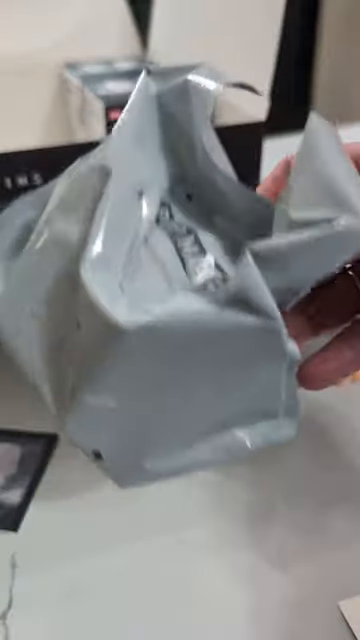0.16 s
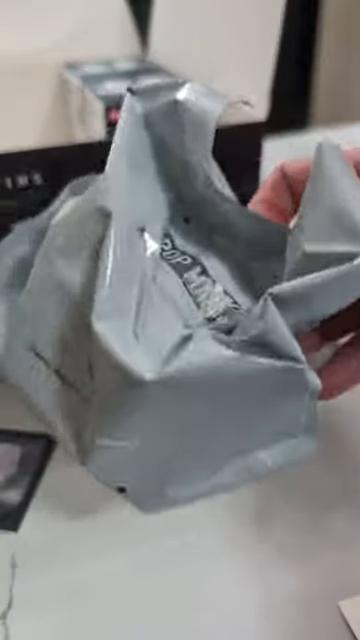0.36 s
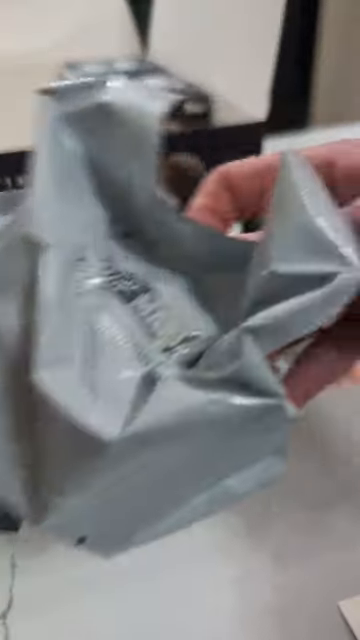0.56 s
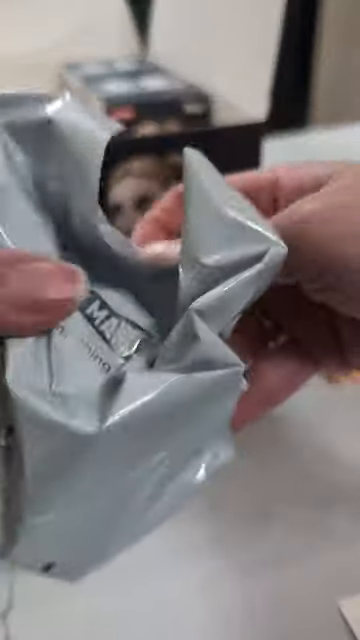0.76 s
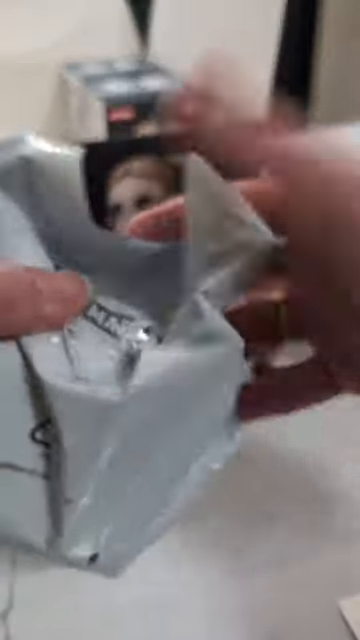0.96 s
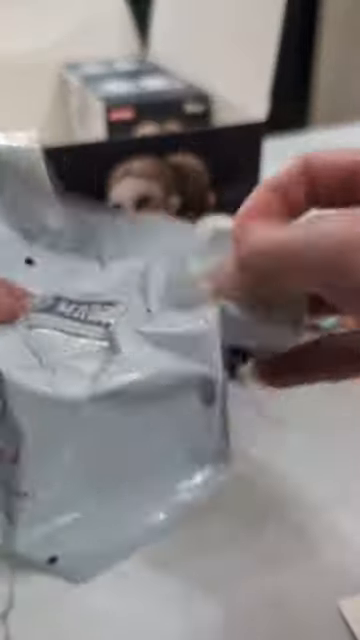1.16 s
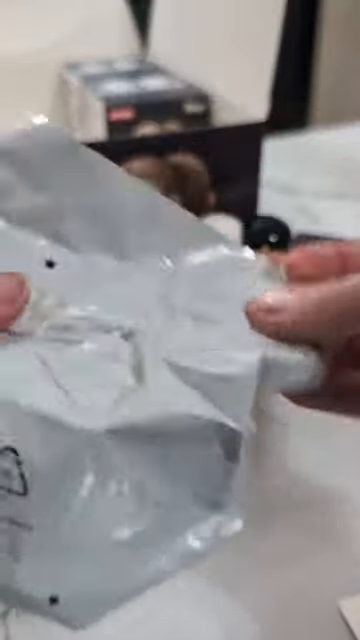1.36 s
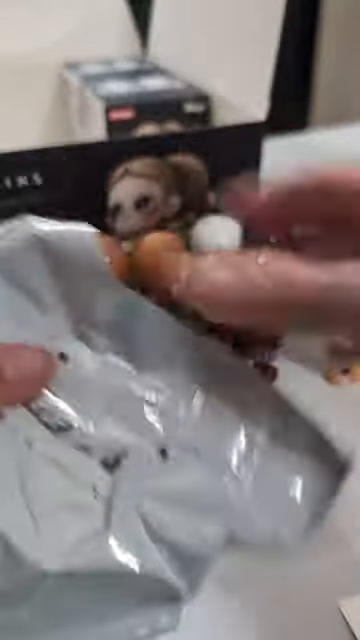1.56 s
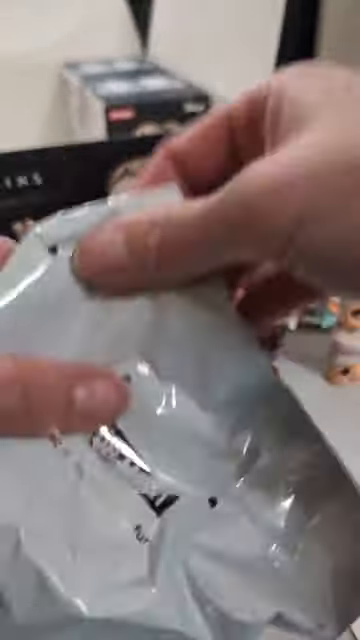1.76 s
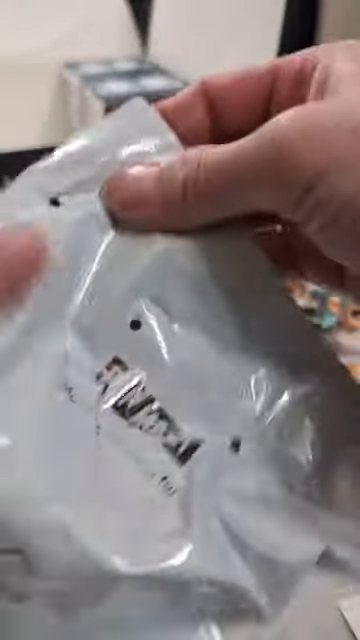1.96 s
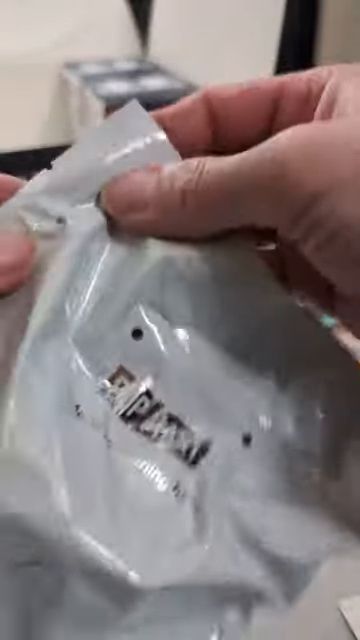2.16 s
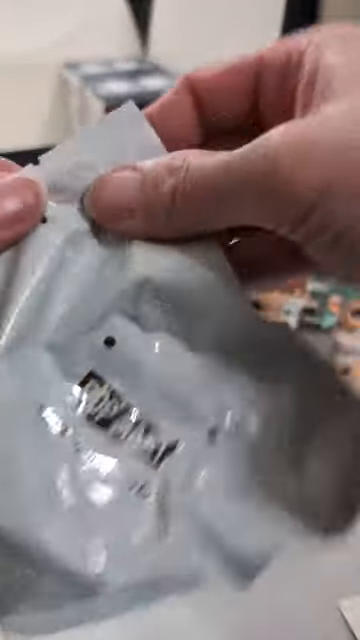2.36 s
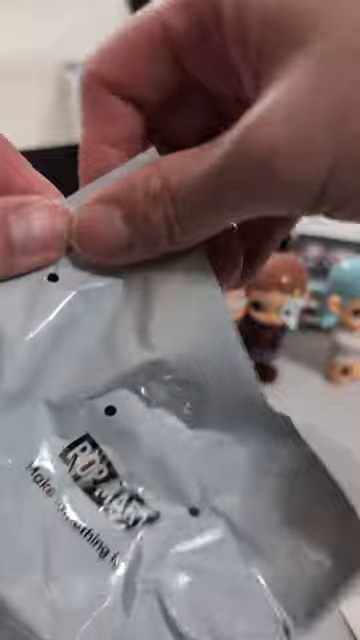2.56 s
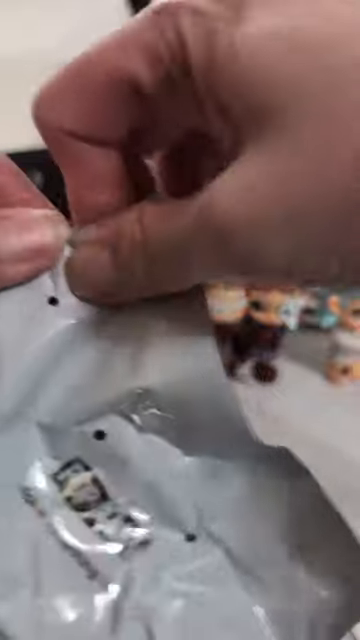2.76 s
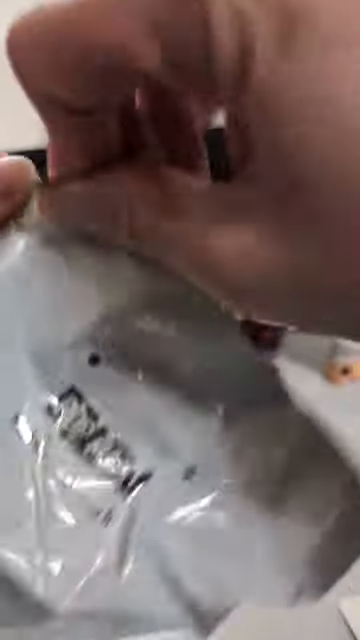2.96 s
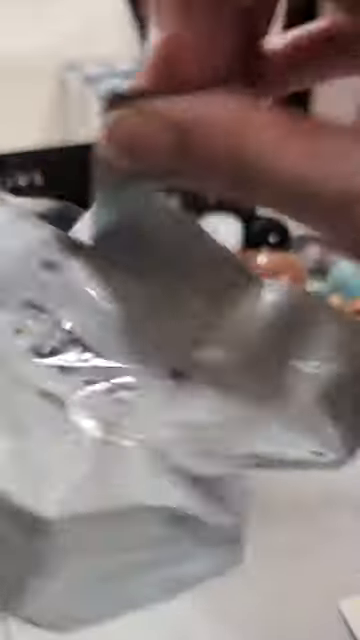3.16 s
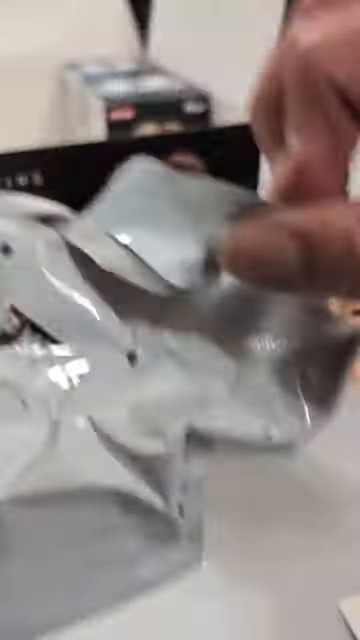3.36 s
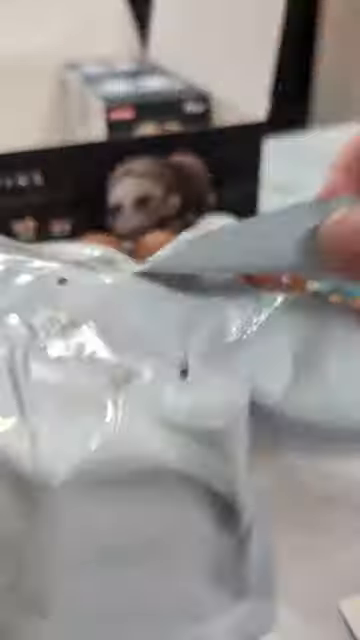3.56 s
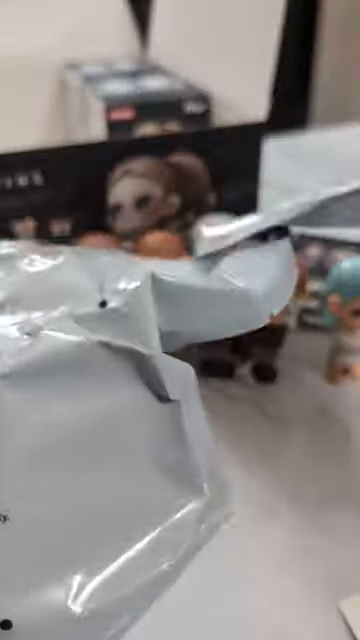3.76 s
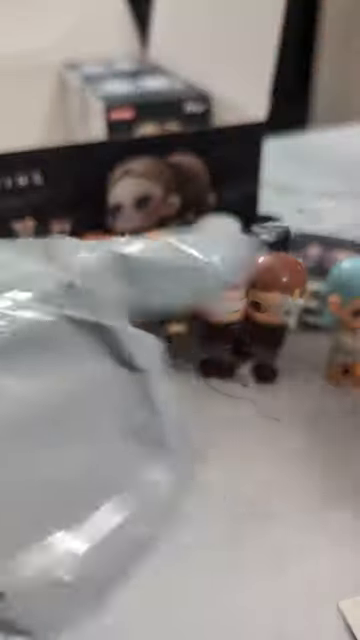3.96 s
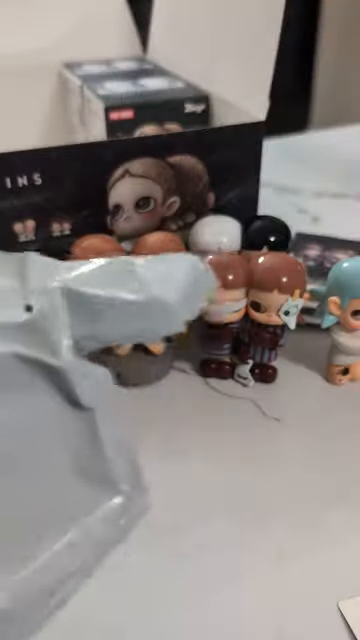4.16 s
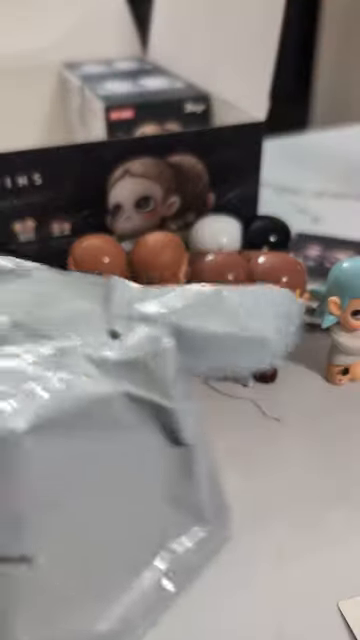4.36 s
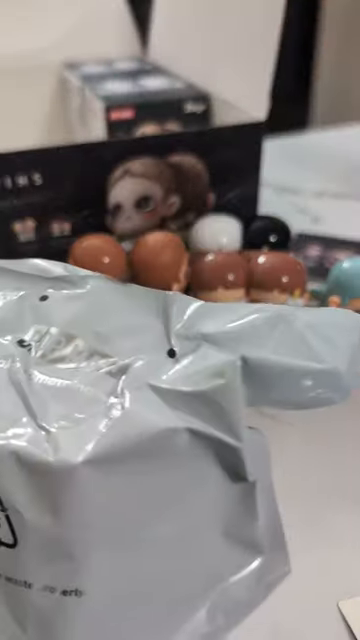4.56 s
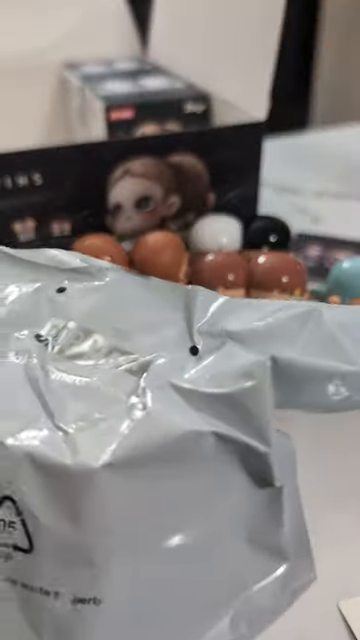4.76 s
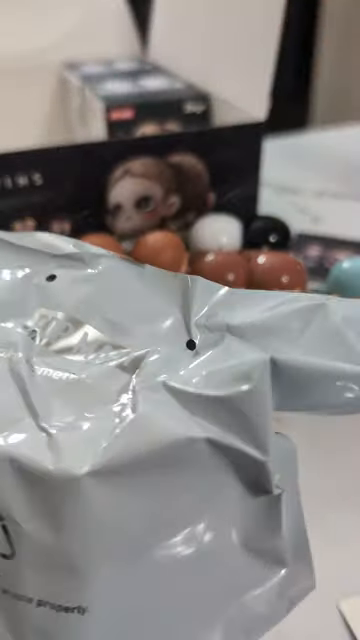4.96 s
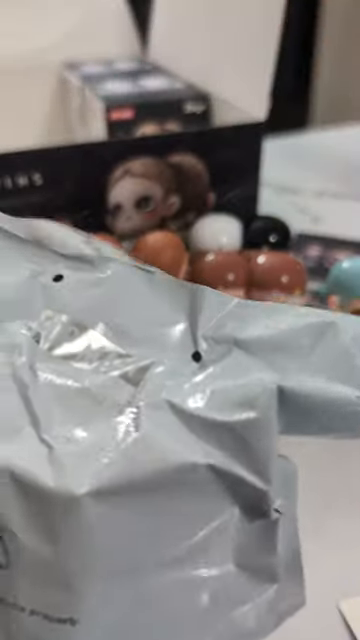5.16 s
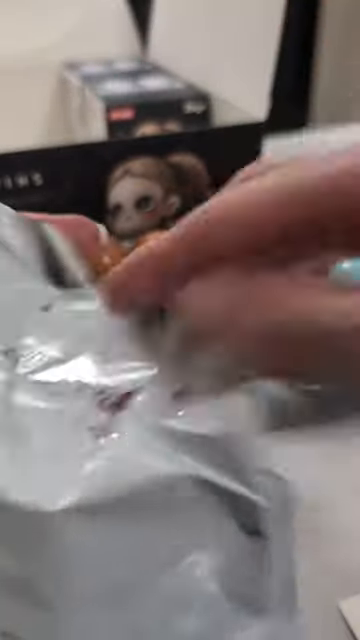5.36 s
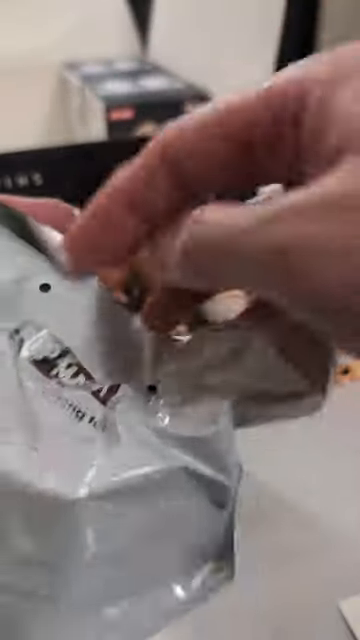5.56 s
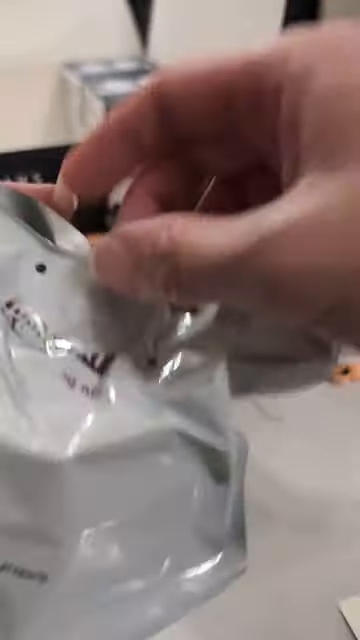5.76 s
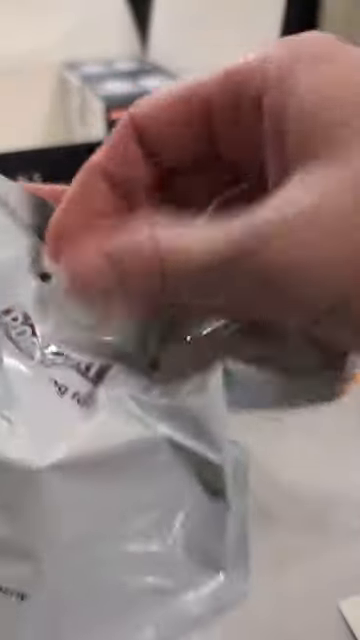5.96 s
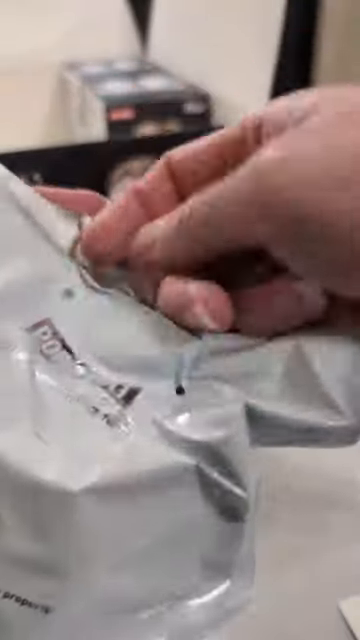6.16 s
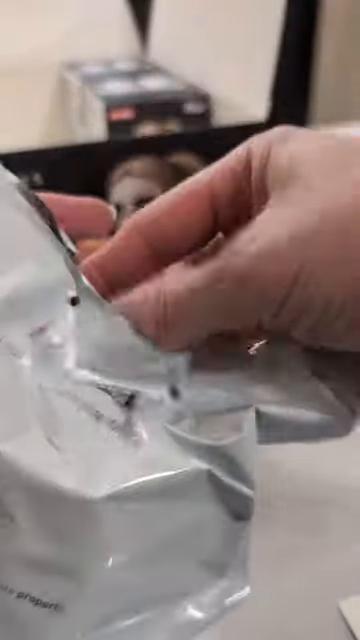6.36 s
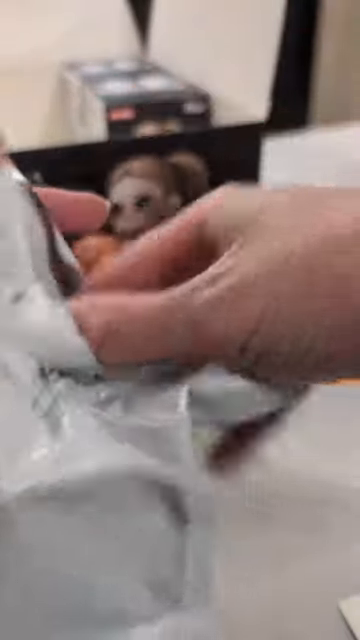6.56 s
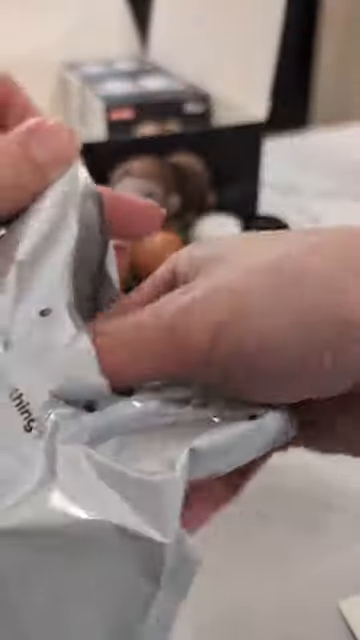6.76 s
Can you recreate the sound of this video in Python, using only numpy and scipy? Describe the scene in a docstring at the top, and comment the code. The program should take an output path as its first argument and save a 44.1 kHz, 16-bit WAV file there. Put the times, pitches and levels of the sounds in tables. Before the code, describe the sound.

A stiff foil pouch is handled very close to two microphones in a small quiet room. It starts with a few crinkles and a hollow thump, then bursts into dense, bright crackling with snapping creases and popping panels. After four seconds it nearly stops, leaving faint room tone and a thin high whistle, then brisk crinkling resumes to the end.

```python
"""Crinkling of a stiff foil pouch

Two hands turn, tear and crinkle a stiff foil pouch close to two spaced microphones.
Buckling creases snap as short noise bursts in four bands; many smaller bursts and a hiss crackle below.
The hollow rings as decaying sines, popping panels push low swings, and slack walls flap as bass noise.
The room answers with a short noise tail over steady room tone; narrow noise whistles faintly in the pause.
"""
import sys
import numpy as np
from scipy import signal
from scipy.fft import rfft, irfft
from scipy.io import wavfile
from scipy.ndimage import uniform_filter1d

SR = 44100
rng = np.random.default_rng(int(sys.argv[2]) if len(sys.argv) > 2 else 0)


def int16_out(signal):
    """Quantize to a 16-bit WAV file."""
    q = np.round(np.clip(np.atleast_2d(signal).T, -1, 1) * 32767)
    wavfile.write(sys.argv[1], SR, q.astype(np.int16))


N = 299880  # samples in the scene
LEAD = 8  # samples by which the left microphone is earlier


def gain_of(db):
    """Decibel law: amplitude gain from a level."""
    return 10 ** (np.asarray(db) / 20)


def evened(x):
    """Power normalisation: scales to rms 1."""
    return x / np.sqrt(np.mean(x ** 2) + 1e-20)


def read(points, hz):
    """Logarithmic frequency scale: interpolates a spectrum table."""
    f, value = np.transpose(points)
    return np.interp(np.log(hz + 1), np.log(f + 1), value)


def along(rows, s):
    """Linear interpolation: a two-column curve at the times s."""
    return np.interp(s, *np.transpose(rows))


def band(x, edges_hz, order=2):
    """Causal band-pass filtering along the last axis."""
    sos = signal.butter(order, edges_hz, "bandpass", fs=SR, output="sos")
    return signal.sosfilt(sos, x)


def pair(shape, alike):
    """Partial coherence: noise for two microphones, its shared power arriving earlier at the left."""
    alike = np.clip(alike, 0, 1)
    shared, left, right = np.moveaxis(rng.standard_normal((*shape, 3)), -1, 0)
    common = np.array([shared, np.roll(shared, LEAD, -1)])
    return np.sqrt(alike) * common + np.sqrt(1 - alike) * np.array([left, right])


def place(s, sounds):
    """Superposition: mixes short sounds (channels, events, samples) at their times."""
    out = np.zeros((2, N + SR))
    starts = np.maximum(np.round(np.asarray(s) * SR), 0).astype(int)
    for at, sound in zip(starts, np.moveaxis(sounds, 1, 0)):
        out[:, at:at + sound.shape[1]] += sound
    return out[:, :N]


def leaned(sounds, left_right_db):
    """Level-difference stereo: splits the difference evenly between the channels."""
    return sounds * gain_of([left_right_db / 2, -left_right_db / 2])


# spectral shape of the room tone: f/Hz, relative density level/dB per Hz
ROOM_TONE = [(24, -34.5), (40, -5.5), (75, -15), (215, -41.5), (1900, -24.5), (7170, -37), (7730, -28.5),
             (8550, -35.5), (16000, -74)]
ROOM_TONE_DB = -70.5  # rms level


def air():
    """Stationary noise: steady room tone, shaped in the frequency domain."""
    spectrum = rfft(pair((N,), 0.91))
    shape = gain_of(read(ROOM_TONE, np.fft.rfftfreq(N, 1 / SR)))
    return gain_of(ROOM_TONE_DB) * evened(irfft(spectrum * shape, N))


# how hard the hands work the foil, as the level of the fine crackle: t/s, level/dB
EFFORT_CURVE = [(0.0, -44.5), (0.2, -52.5), (0.51, -64.5), (0.6, -60.5), (0.735, -67.5), (0.76, -43.5),
                (0.93, -43.5), (0.97, -50), (1.1, -47), (1.17, -36), (1.4, -39.5), (1.59, -38),
                (1.65, -46.5), (1.76, -53), (1.83, -38), (1.93, -47), (2.05, -35), (2.29, -39.5),
                (2.36, -56), (2.5, -49), (2.6, -54), (2.75, -57), (3.0, -52.5), (3.14, -43), (3.19, -28),
                (3.26, -30), (3.31, -45.5), (3.37, -49.5), (3.56, -57), (3.66, -35.5), (3.74, -26.5),
                (3.81, -34.5), (3.87, -56), (3.97, -31), (4.06, -36), (4.235, -72.5), (4.64, -82.5),
                (4.8, -63), (4.905, -77.5), (4.92, -57.5), (5.2, -87.5), (5.25, -51), (5.36, -77.5),
                (5.44, -33), (5.52, -47.5), (5.59, -60), (5.75, -57.5), (5.8, -47.5), (5.92, -54),
                (6.02, -52), (6.06, -45), (6.22, -41), (6.36, -48.5), (6.47, -40), (6.6, -43), (6.7, -31.5),
                (6.745, -40), (6.8, -35.5)]
SETTLE_DB, SETTLE_S = -26.5, 0.051  # level under the snap; time constant of its power
BRISK_DB = -40  # handling level that counts as brisk


def handling():
    """Power summation: handling level in dB, the effort plus creases crackling on after each snap."""
    s, db = np.array(SNAP_EVENTS).T[:2]
    kicks = np.zeros(N)
    np.add.at(kicks, (s * SR).astype(int), gain_of(db + SETTLE_DB) ** 2)
    settling = signal.lfilter([1], [1, -np.exp(-1 / (SETTLE_S * SR))], kicks)
    effort = gain_of(along(EFFORT_CURVE, np.arange(N) / SR)) ** 2
    return 10 * np.log10(effort + settling)


# bass, body, edge and treble bands of a crease: lower f/Hz, upper f/Hz
CREASE_BANDS = [(250, 1300), (1300, 3500), (3500, 8000), (8000, 17500)]
# share of each band's power that both microphones hear alike: one fraction per band
BAND_ALIKE = [1, 0.23, 0.18, 0.046]
# relative fading time of each band: one factor per band
BAND_FADE = [1.2, 1.04, 0.97, 1.08]
# where the hands are: t/s, left-right level difference/dB
HAND_SIDE = [(0.0, -4.5), (0.04, 7), (0.11, -1.5), (0.55, -3.5), (0.58, -4.5), (0.85, 4.5), (1.76, 1.5),
             (2.39, 1.5), (2.52, -2), (2.56, 8), (2.88, -2.5), (3.2, 1.5), (6.59, 1.5), (6.8, -1)]


def snap(s, bands_db, length_ms, size=1200, rise=0.38, fall=0.63, after_db=-22, after_ms=10.0,
         scatter_db=3.5, jerk_db=1.23):
    """Buckling: a crease strains, gives way and shivers, bass fading slowest, near the hands."""
    before_ms = 6  # room for the build-up
    ms = np.arange(size) * 1000 / SR - before_ms
    since = np.maximum(ms, 0)
    length = np.clip(length_ms, .4, 8)[:, None]  # scales the rise and fall time constants
    wander = evened(uniform_filter1d(rng.standard_normal((len(s), size)), size=45))
    jerks = gain_of(jerk_db * length * wander)  # a long crease gives way in several jerks
    build_up = np.exp(np.minimum(ms, 0) / (rise * length))
    afterglow = gain_of(after_db) * np.exp(-since / after_ms)
    out = np.zeros((2, len(s), size))
    for edges, db, slow, alike in zip(CREASE_BANDS, bands_db, BAND_FADE, BAND_ALIKE):
        shape = build_up * (np.exp(-since / (slow * fall * length)) + afterglow)
        part = band(pair((len(s), size), alike) * shape * jerks, edges, order=3)
        top = np.sqrt(uniform_filter1d(part ** 2, size=90).max(2))  # rms of the loudest 2 ms
        out += part * (gain_of(db) / top)[:, :, None]
    pan_db = along(HAND_SIDE, s) + scatter_db * rng.standard_normal(len(s))
    return place(s - before_ms / 1000, leaned(out, pan_db[:, None]))


def crackle(hands_db, count=2200, spread_db=7.5, colour_db=18, hiss_db=-7, dulling=0.36, rubbing=0.078):
    """Random superposition: many small creases over skin hiss; gentle handling is duller, more rubbing."""
    when, u, length, *colour = rng.random((count, 7)).T
    s = when * N / SR
    gentle_db = np.minimum(hands_db[(s * SR).astype(int)] - BRISK_DB, 0)
    size_db = spread_db * np.minimum(-np.log(u + 1e-9), 2.5)  # few large creases, many small
    bands_db = size_db + colour_db * np.array(colour) + np.array([[-14], [-5], [0], [-4]])
    bands_db += np.outer([0, 0, 0, dulling], gentle_db)  # only the treble dulls
    grains = snap(s, bands_db, 0.3 + 3.0 * length, size=600)
    hiss = band(pair((N,), 0.063), (1300, 7500), order=1)
    hiss_gain = gain_of(hiss_db - rubbing * (hands_db - BRISK_DB))
    return gain_of(hands_db) * evened(evened(grains) + hiss_gain * evened(hiss))


FLUTTER_DB, FLUTTER_FOLLOW = -46.5, 0.84  # level at brisk handling; dB gained per dB of handling


def flutter(hands_db, lump_db=7):
    """Amplitude modulation: slack walls flap unevenly, mostly in the bass."""
    lumps = np.tanh(evened(uniform_filter1d(rng.standard_normal(N), size=500)))
    walls = band(pair((N,), 0.84), (90, 700))
    level = gain_of(FLUTTER_DB + FLUTTER_FOLLOW * (hands_db - BRISK_DB))
    return level * evened(walls * gain_of(np.minimum(lump_db, 10) * lumps))


# band of the rumble: lower f/Hz, upper f/Hz
SWAY_BAND = (50, 115)
SWAY_DB, SWAY_FOLLOW = -64, 0.32  # level at brisk handling; dB gained per dB of handling


def sway(hands_db):
    """Band-limited noise: a low wandering rumble while the pouch is moved."""
    level = gain_of(SWAY_DB + SWAY_FOLLOW * (hands_db - BRISK_DB))
    return level * evened(band(pair((N,), 0.16), SWAY_BAND))


# creases buckling: t/s, level/dB, boom (bass over that level)/dB, brightness (treble over body)/dB,
# nominal length/ms, which scales the time constants
SNAP_EVENTS = [(0.0408, -35.5, -3.5, -7, 1.6), (0.0539, -32, -3, -5.0, 2.3), (0.1094, -44, 2, -16, 2.2),
               (0.1861, -37, 7.5, -5.0, 9), (0.295, -45, 18.5, -1, 3.8), (0.3376, -44.5, 5, -10, 2.4),
               (0.353, -51, 21, 2, 1.1), (0.693, -70.5, 21, 11, 2.6), (0.7458, -47.5, -5, -1, 3.6),
               (0.8009, -43, -16, -14, 1.9), (0.8167, -37.0, -4, -2, 1.5), (0.83, -26.5, 0, 6.5, 1),
               (0.8844, -35, 14.0, -17, 1.5), (0.9086, -24, -1.0, 1, 0.67), (0.943, -26.5, -2, 5, 3.1),
               (0.9882, -29.5, -20, -4.0, 0.74), (0.9981, -27, -12, -16, 0.96),
               (1.051, -38.5, 12.5, -43.5, 1.55), (1.1514, -34, -4.0, -3, 2.5),
               (1.1556, -21, -8.0, 8.0, 1.1), (1.171, -25.5, 1, 4, 3.2), (1.1796, -25.5, -1, 0, 1.4),
               (1.1836, -27.0, -12, 1.0, 1.8), (1.195, -27, -9.0, 18, 0.93), (1.2105, -19.5, -18, 7.0, 1.5),
               (1.2225, -24, -2.5, 2, 3.4), (1.2314, -20.0, -28, 4.5, 1.1), (1.2465, -23.5, -3.5, 7, 2.4),
               (1.2634, -20.5, -4.5, 8, 0.92), (1.279, -26.5, -12, 4, 1.8), (1.3354, -25.5, 1, 0, 2.5),
               (1.3772, -21, -8, 2.5, 4.8), (1.4093, -23, -10.0, -2, 2), (1.4827, -32.5, 3.5, -14, 0.57),
               (1.5082, -28, -1, 18, 0.96), (1.52, -23, -17, 2, 1), (1.5344, -33, -8, 7, 2.3),
               (1.545, -32.5, -16, -3, 1.7), (1.5733, -29.5, 3, -13, 1.1), (1.5788, -33, 0.5, -11.0, 2.2),
               (1.5843, -24.5, -4.5, 10, 0.98), (1.6056, -28.0, -1, -8.5, 1.4), (1.7045, -40, -6, -9, 1.4),
               (1.721, -38.5, -7, -2, 2), (1.7267, -32.0, -11, -2, 1.8), (1.7737, -31, -13.0, -5, 1.5),
               (1.7914, -32.5, 1, -3, 1.7), (1.8139, -38.0, 9.5, -15, 1.2), (1.8345, -19.5, -5.5, 2.5, 5.3),
               (1.8856, -35.5, 0, -27.5, 2.9), (1.9073, -30, -13.0, -4, 2.3), (1.944, -19, 4.5, 3.5, 1.9),
               (1.9624, -25, -13, 1, 2.4), (2.02, -21.5, -22, 5.5, 1.3), (2.038, -27.5, -4, 9, 2.4),
               (2.0528, -27.5, -17, 4, 3.3), (2.0661, -23, -5, 0, 5.8), (2.1063, -25.5, -4.5, 0, 1.3),
               (2.144, -20.5, -13.0, 3, 1), (2.1662, -25.5, -19, -2, 4), (2.1791, -25, -5.5, -4, 2.8),
               (2.2253, -41, 8, -23, 1.5), (2.2577, -24.5, -4.5, 11.5, 2.1), (2.3717, -30, -1, -10.5, 1.6),
               (2.4279, -48, -14, -15.0, 1.7), (2.4328, -42, -13, -12.0, 1.7),
               (2.4402, -31.5, -7, 18, 0.85), (2.4454, -35, -9, 9, 1.6), (2.4662, -36.5, 6, 0, 1.1),
               (2.4813, -23.5, -1.5, 2.0, 0.6), (2.5111, -23.0, -10, 12, 2.2), (2.584, -54, 20.5, -5, 1.3),
               (2.5933, -25.5, -9.5, -4.5, 3), (2.814, -36, 0.5, -4, 2.2), (2.8495, -37, -30, 6.5, 1.4),
               (2.8867, -32.5, 3.5, 6, 1.9), (2.9103, -28.5, -5, 11.5, 1.2), (2.9742, -41.0, 0, -1.0, 2.5),
               (3.0078, -36.5, -1, -5, 1.4), (3.0471, -19.5, -6, -10, 1.3), (3.0509, -21.5, 2.5, 10.5, 1.1),
               (3.0713, -26.5, -1, 1, 2.3), (3.153, -28.5, -2, 1, 1.7), (3.2228, -27.5, 0.5, -10, 4.2),
               (3.2505, -29, 3, 5, 1.2), (3.255, -28.5, -3.5, 15, 1.4), (3.2897, -26, -2.5, -3, 0.92),
               (3.304, -27, -3, -4, 1.2), (3.3323, -30, -4.5, -3.0, 2.5), (3.3938, -38, -1.5, 4, 1.4),
               (3.4155, -41, -10, 15, 1.6), (3.4282, -37.5, 3.5, -17, 1.3), (3.4442, -39.5, 5.5, -24, 3.5),
               (3.5223, -50, 7, -29, 2.1), (3.5658, -44.5, 2.5, 2, 1.7), (3.5889, -53.5, 18, -35.5, 2.6),
               (3.6178, -41.5, 8, -9.0, 1.2), (3.6441, -22.0, -0.5, 8, 3.1), (3.6917, -24.5, 0.5, 8, 1.4),
               (3.6999, -27.5, -20, 5, 2), (3.71, -28, -16, 14.5, 2.3), (3.7231, -24.5, -25, 7.5, 1.8),
               (3.7413, -27.5, -11, 8, 1.7), (3.7618, -28, -5, 7.5, 4), (3.8713, -36.5, 2, 6, 2.5),
               (3.9143, -20.5, -4.5, 8, 2), (3.9703, -20.5, 1.5, 2.5, 2.64), (3.9837, -35, 10.5, -7.5, 1.9),
               (4.0478, -26.5, 2.5, 8.5, 3), (4.1637, -54, 2.5, -29, 0.65),
               (4.2639, -57.5, 3.5, -26.5, 1.2), (4.4732, -64, 12.5, -8.5, 2.1),
               (4.5029, -47.5, 7.5, -8.5, 1.27), (4.5664, -48.0, -2, -13, 1.5), (4.725, -69, -0.5, 3, 3),
               (4.9143, -53, -7, -1.5, 2.8), (5.0679, -59.5, -9.5, -31.0, 2.4),
               (5.23, -37.5, 0.0, -3.5, 1.27), (5.2517, -31, -5.5, 9.5, 3.4), (5.2857, -46, -2, 7, 2),
               (5.386, -47.5, -1.0, -23, 1.7), (5.3965, -45.5, 10.0, -32, 0.7), (5.418, -29, -10, -15, 1.5),
               (5.4391, -32, -22, 5, 1.9), (5.4566, -28.0, -7, 8, 1.6), (5.4876, -42, -14, 16, 2.6),
               (5.5102, -34.5, -6, -2, 3.8), (5.5626, -51, 7, -40, 2), (5.6126, -48, 1, -37, 2.3),
               (5.6863, -30, -6, 18.5, 2.3), (5.7103, -29, -2, 10.5, 1.7), (5.7238, -37, -3, -1, 2.8),
               (5.7736, -26, -6, -2, 2.7), (5.795, -24.5, -7.5, 11.5, 1.3), (5.9509, -31.0, -11, 11, 1.2),
               (5.9576, -38.5, -9, -10, 1.9), (5.9627, -33.5, -4.0, -17, 2.1),
               (6.0074, -41.5, 9.0, -9, 3.6), (6.0387, -40, 4, -12, 1.7), (6.0477, -26.5, -6, 1, 4.1),
               (6.0804, -31.0, -14, 13, 1.7), (6.1107, -29, -2, 8.5, 4.3), (6.14, -41.0, -11, -17.0, 1.5),
               (6.1576, -32.5, -8, 5, 1.2), (6.1974, -32.5, 5.5, 0.0, 6.6), (6.2218, -29.0, -8, 8, 4),
               (6.2335, -27.5, -19, 2, 0.95), (6.3096, -36, 0, -2, 3.0), (6.3964, -38.0, -17, -4.0, 1.8),
               (6.4317, -39, -5, -15, 1.5), (6.4444, -28, -7.5, 6, 1.2), (6.4484, -23.5, -16, 12, 1.4),
               (6.4712, -25, -7.5, 7, 2.5), (6.4865, -33.5, 5.5, -11, 1.5), (6.5064, -25.5, -6.5, -6, 1.2),
               (6.528, -26, -13, 15, 1.4), (6.5415, -23, -2.5, -19.5, 2.1), (6.681, -28, 1.5, 3.5, 5.3),
               (6.7083, -33, 6, 1.0, 4.4), (6.768, -27.0, -18, 5, 1.5), (6.7798, -27, -29, -1, 1.3)]
EDGE_DB, BODY_SHARE = 3, 0.36  # edge band over the level; share of the brightness taken from the body


def snaps():
    """Spectral balance: each crease has bass by its boom, body against treble by its brightness."""
    s, db, boom_db, bright_db, length_ms = np.array(SNAP_EVENTS).T
    body_db = db - BODY_SHARE * bright_db
    bands_db = [db + boom_db, body_db, db + EDGE_DB, body_db + bright_db]
    return snap(s, bands_db, length_ms)


# whole panels popping through: t/s, relative level/dB
PANEL_POPS = [(0.1, -54), (0.182, -40.5), (0.78, -46), (0.834, -49), (0.944, -44), (1.107, -45),
              (1.216, -33), (1.404, -39), (1.582, -39), (1.657, -43), (1.775, -38.5), (1.834, -33),
              (1.938, -45), (2.037, -40), (2.155, -56), (2.255, -52), (2.494, -45), (2.569, -46),
              (2.887, -43), (3.047, -42), (3.17, -44.5), (3.235, -42.5), (3.638, -46.5), (3.742, -47),
              (3.965, -40.5), (4.04, -43.5), (4.106, -49.5), (5.413, -39.5), (5.49, -48), (5.682, -55),
              (6.107, -48), (6.21, -68), (6.471, -51), (6.529, -60), (6.672, -45)]


def pushes(low_hz=55, drop=1.6, drop_ms=18, rise_ms=8, fade_ms=24, pitch_spread=.12, lean_db=6.5):
    """Volume displacement: a popping panel pushes a low swing that falls in pitch and soon dies."""
    s, db = np.array(PANEL_POPS).T[:, :, None]
    pitch, lean = rng.standard_normal((len(s), 2)).T[:, :, None]
    ms = np.arange(9000) * 1000 / SR
    settled_hz = low_hz * np.exp(np.tanh(pitch) * pitch_spread)
    turns = settled_hz * np.cumsum(1 + drop * np.exp(-ms / drop_ms)) / SR
    envelope = (1 - np.exp(-ms / rise_ms)) * np.exp(-ms / fade_ms)
    swing = 2 * gain_of(db) * envelope * np.sin(2 * np.pi * turns)
    return place(s[:, 0], leaned(swing, lean_db * lean))


# the hollow pouch knocked or popping out: t/s, level/dB, settled pitch f/Hz
THUD_EVENTS = [(0.181, -19, 570), (0.182, -12.5, 264.7), (0.29, -21, 500), (0.351, -22.5, 548),
               (0.744, -33.5, 315), (0.764, -24.5, 745), (0.865, -36, 462), (0.884, -45, 770),
               (1.046, -33, 890), (1.172, -28, 186), (1.335, -25, 360), (1.435, -27, 409),
               (1.655, -28, 473), (1.681, -29.5, 516), (1.76, -27, 560), (1.831, -32, 189),
               (1.889, -33, 224), (1.962, -28, 315), (2.098, -24.5, 295), (2.255, -12, 850),
               (2.464, -17, 746), (2.581, -38, 899), (3.045, -16.5, 382), (3.068, -18.5, 700),
               (3.231, -21.5, 493), (3.433, -37.5, 358), (3.518, -33.5, 414), (3.643, -27, 350),
               (3.743, -27, 403), (3.793, -21.5, 740), (3.834, -36, 382), (3.911, -26, 382),
               (3.967, -23, 280), (3.996, -31, 187.6), (4.118, -52, 121), (4.505, -52, 235),
               (4.716, -58.5, 432), (4.77, -54, 1080), (4.805, -59, 229), (4.918, -54, 453),
               (4.99, -54.5, 547), (5.419, -34, 234), (5.611, -41, 1330), (5.687, -29.5, 253),
               (5.8, -42, 201), (5.842, -42.5, 226), (6.186, -24.5, 358), (6.197, -30, 1210),
               (6.474, -27, 430), (6.569, -17, 530), (6.617, -28.5, 333), (6.678, -32, 785),
               (6.703, -23.5, 274)]


def thuds(rise_ms=0.91, cycles=8.1, tail_db=-14, linger=9.4, low_hz=300, sag=0.087, sag_ms=5.2):
    """Cavity resonance: a knock rings the hollow, settling to its pitch; a weak part lingers if low."""
    s, db, hz = np.array(THUD_EVENTS).T[:, :, None]
    ms = np.arange(9000) * 1000 / SR
    turns = hz * np.cumsum(1 + sag * np.exp(-ms / sag_ms)) / SR
    fade_db = -60 / cycles * turns  # the main ring dies by 60 dB in this many cycles
    tail = gain_of(tail_db + fade_db / linger) * np.minimum(low_hz / hz, 1) ** 2
    envelope = (1 - np.exp(-ms / rise_ms)) * (gain_of(fade_db) + tail)
    ring = gain_of(db) * envelope * np.sin(2 * np.pi * turns)
    both = np.array([ring, np.roll(ring, LEAD, 1)])
    return place(s[:, 0], leaned(both, along(HAND_SIDE, s)))


# puffs of the whistle: t of the peak/s, peak level/dB
WHISTLE_PUFFS = [(4.665, -59.5), (4.79, -56), (4.88, -75), (5.0, -65), (5.08, -80), (5.14, -75.5),
                 (5.295, -47.5)]
WHISTLE_HZ, WHISTLE_WIDTH_HZ = 7560, 130
PUFF_RISE_DB_PER_S, PUFF_FALL_DB_PER_S = 901.5, 302


def whistle():
    """Narrow-band noise: a thin sound near one pitch, in puffs."""
    edges = WHISTLE_HZ - WHISTLE_WIDTH_HZ / 2, WHISTLE_HZ + WHISTLE_WIDTH_HZ / 2
    t = np.arange(N) / SR
    puffs = np.zeros(N)
    for s, db in WHISTLE_PUFFS:
        slope_db = np.minimum(PUFF_RISE_DB_PER_S * (t - s), PUFF_FALL_DB_PER_S * (s - t))
        puffs += gain_of(db + slope_db)
    return puffs * evened(band(pair((N,), 0.25), edges, order=1))


# reverberation of the room: f/Hz, time to die by 60 dB/s
REVERBERATION = [(200, 0.5), (530, 0.083), (1400, 0.26), (3700, 0.072), (9700, 0.07)]
ROOM_DB = -14.5  # gain of the echo


def room(x):
    """Diffuse reverberation: a noise tail per microphone, every band dying at its own speed."""
    hz, t, z = signal.stft(rng.standard_normal((2, SR // 2)), SR, nperseg=256)
    decay = gain_of(-60 * t / read(REVERBERATION, hz)[:, None])
    tail = signal.istft(z * decay, SR, nperseg=256)[1]
    tail = np.pad(tail, ((0, 0), (200, 0)))  # the nearest surfaces answer after 4.5 ms
    return signal.fftconvolve(x, tail / np.linalg.norm(tail[0]), axes=1)[:, :N]


def scene():
    """Linear superposition: the pouch, its echo and the quiet room."""
    hands_db = handling()
    pouch = snaps() + thuds() + crackle(hands_db)
    echo = gain_of(ROOM_DB) * room(pouch)
    return pouch + echo + flutter(hands_db) + pushes() + sway(hands_db) + whistle() + air()


# microphone port resonances: f/Hz, width at half the dB lift/Hz, lift/dB
PORT_PEAKS = [(3316, 1010, 4), (5470, 700, 4), (11560, 2000, 4.5)]
# colour difference of the two microphones: f/Hz, left-right level/dB
MICROPHONE_LEAN = [(100, 0), (350, -3), (800, 7), (1300, 1.5), (4400, -4), (9000, -1.5)]


def record(dry):
    """Transducer response: port resonances, unlike microphones, bass cut, overload and band limit."""
    hz = np.fft.rfftfreq(2048, 1 / SR)
    lift_db = sum(db / (1 + (2 * (hz - f) / width) ** 2) for f, width, db in PORT_PEAKS) - 1.5
    lean_db = read(MICROPHONE_LEAN, hz)
    lifts = gain_of([lift_db + lean_db / 2, lift_db - lean_db / 2])
    # squared, since the minimum-phase step takes the root of the magnitude
    taps = np.array([signal.minimum_phase(signal.firwin2(1023, hz, lift ** 2, fs=SR)) for lift in lifts])
    coloured = signal.oaconvolve(dry, taps, axes=1)[:, :N]
    cut = signal.sosfilt(signal.butter(4, 50, "highpass", fs=SR, output="sos"), coloured)
    overloaded = np.clip(cut, -.85, .85)
    band_limit = signal.firwin(255, 16000, window=("kaiser", 9), fs=SR)  # low-pass at 16 kHz
    return signal.oaconvolve(overloaded, band_limit[None], "same")


dry = scene()
out = record(dry)
int16_out(out)
```